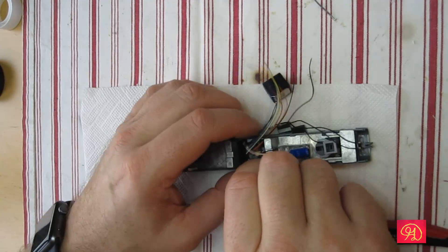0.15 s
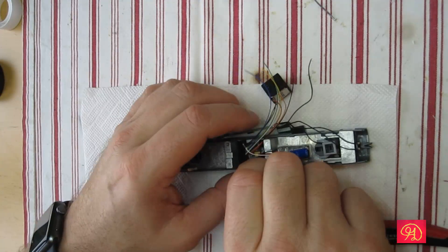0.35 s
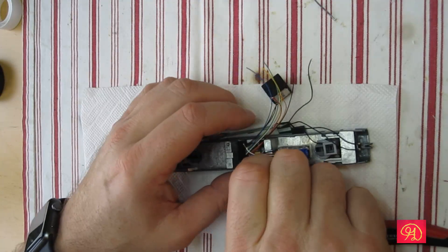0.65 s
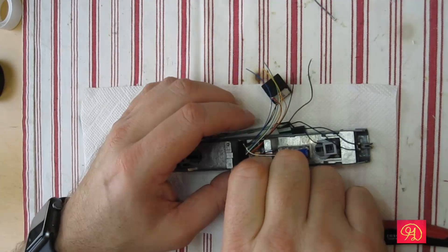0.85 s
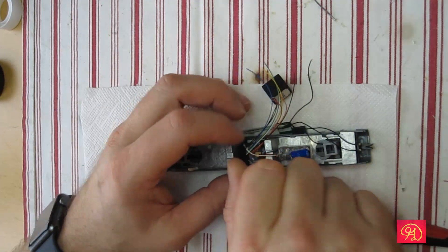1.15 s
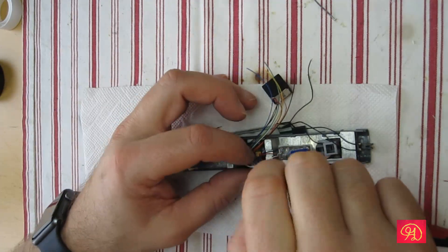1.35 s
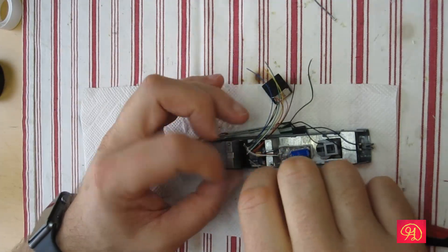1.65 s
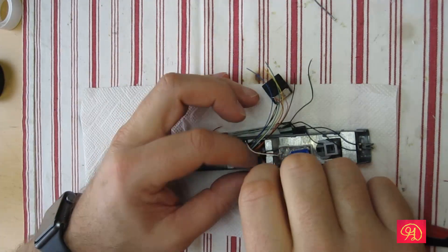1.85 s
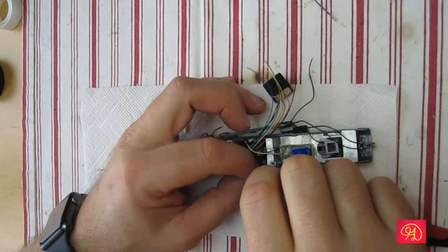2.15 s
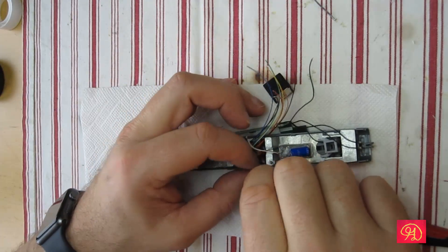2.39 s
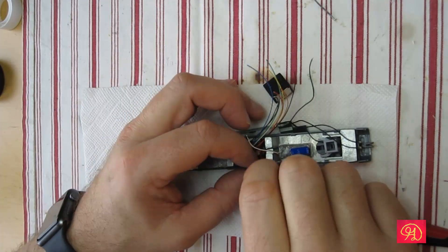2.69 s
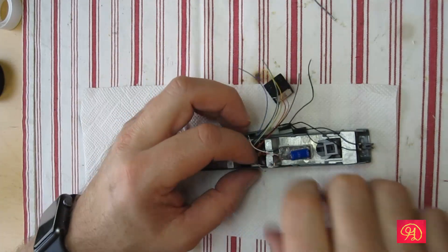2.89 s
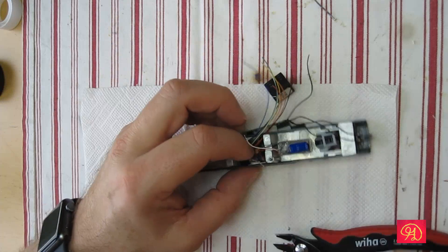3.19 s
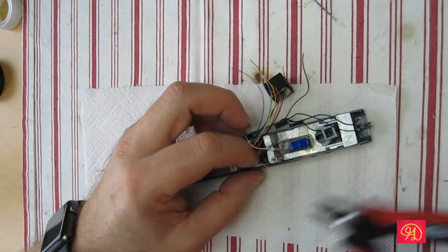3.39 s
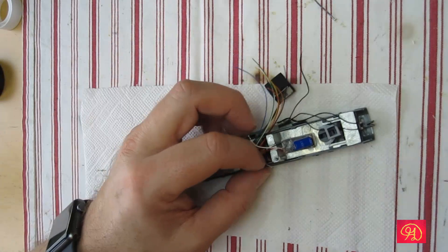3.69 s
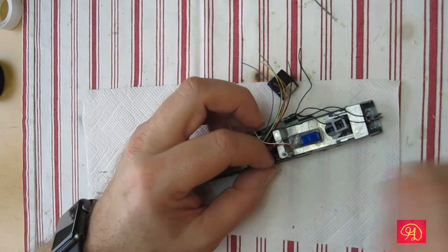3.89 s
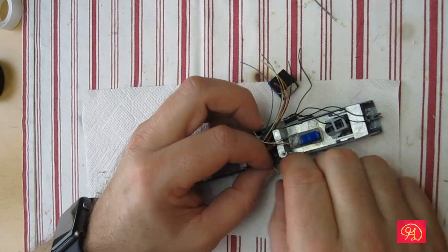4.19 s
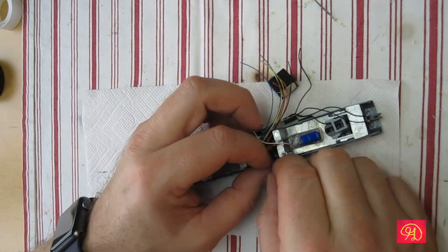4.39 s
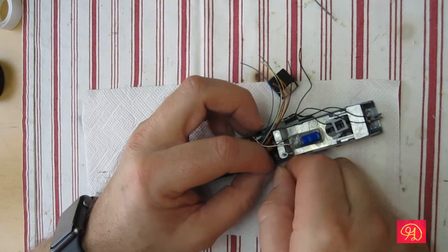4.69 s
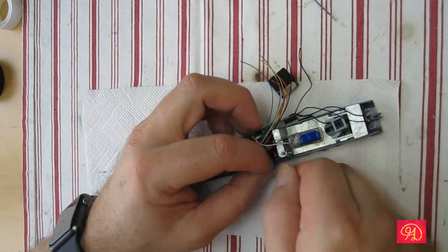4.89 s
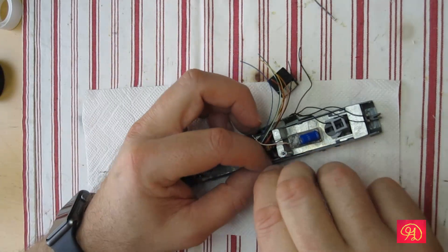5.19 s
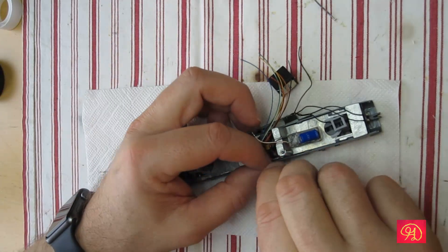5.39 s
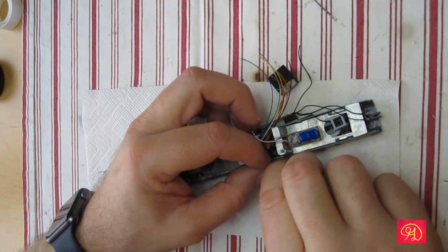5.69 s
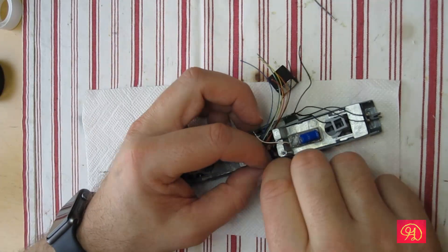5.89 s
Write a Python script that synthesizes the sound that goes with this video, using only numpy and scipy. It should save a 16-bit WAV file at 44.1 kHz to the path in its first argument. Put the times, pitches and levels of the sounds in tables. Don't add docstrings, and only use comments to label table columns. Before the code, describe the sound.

Hands work on a small metal assembly, heard by a camera microphone just above the bench. Sharp little clicks and a brief squeaky scrape open it, followed by sparse ticks and dry rubbing. Paper rustles and pops before a hand tool lands with a burst of hard knocks and rattling jaws, by far the loudest event. Thin whine, hiss and a faint once-a-second clock continue throughout.

```python
import sys
import numpy as np
from scipy import signal
from scipy.fft import rfft, irfft, dct
from scipy.io import wavfile
from scipy.ndimage import uniform_filter1d

SR = 44100
rng = np.random.default_rng(int(sys.argv[2]) if len(sys.argv) > 2 else 0)


def inscribe(sig):
    pcm = np.round(np.clip(np.atleast_2d(sig).T, -1, 1) * 32767)
    wavfile.write(sys.argv[1], SR, pcm.astype(np.int16))


def rack_gain(trim_db):
    fader = np.asarray(trim_db, float)
    return 10 ** (fader / 20)


N = 266805

# [f/Hz, bandwidth/Hz, level/dB]
BOARD_MODES = [(232, 52, -6.5), (292, 38, -8), (404, 140, -1), (537, 170, 1.5), (680, 40, -1.5),
               (870, 120, 3), (970, 300, 5), (1120, 87, 1.5), (1400, 120, 6), (1640, 110, -2.5),
               (1845, 57, -4), (2100, 120, 1), (2500, 69, -10), (2850, 130, -11), (2800, 63, -29),
               (3880, 87, -11.5), (4750, 190, -11.5)]


def add(track, s, sound):
    i = int(s * SR)
    track[i:i + len(sound)] += sound[:N - i]


def unit(x):
    return x / np.sqrt(np.mean(x ** 2))


def band(x, hz, width):
    return signal.lfilter(*signal.iirpeak(hz, hz / width, SR), x)


def lowpass(x, hz):
    return signal.lfilter(*signal.butter(2, hz, fs=SR), x)


def ring(hz, gain, t60):
    t = np.arange(SR // 4)[:, None] / SR
    return np.sum(gain * np.sin(2 * np.pi * hz * t) * 1000 ** (-t / t60), axis=1)


def crack(t60, low_hz, high_hz):
    t = np.arange(SR // 4) / SR
    burst = rng.standard_normal(SR // 4) * 1000 ** (-t / t60) / 2
    return signal.sosfilt(signal.butter(2, [low_hz, high_hz], "band", fs=SR, output="sos"), burst)


def walk(rate):
    k = int(SR / rate)
    return unit(uniform_filter1d(uniform_filter1d(rng.standard_normal(N), k), k))


def grains(count, scatter_db):
    size = rack_gain(scatter_db * rng.exponential(size=count // 40 + 1))
    return unit(rng.standard_normal(count) * np.repeat(size, 40)[:count])


def hiss():
    # [f/Hz, level/dB]
    envelope = [(12, -52), (20, -5.5), (127, -4.5), (163, -6), (187, -2), (319, -5.5), (398, -6), (471, -7),
                (557, -4.5), (1570, -9.5), (1960, -8), (2190, -5), (3070, -13), (9650, -20), (16000, -30.5)]
    hz, db = np.transpose(envelope)
    f = np.maximum(np.fft.rfftfreq(N, 1 / SR), 1)
    shape = rack_gain(np.interp(np.log(f), np.log(hz), db))
    noise = irfft(rfft(rng.standard_normal(N)) * shape, N)
    return rack_gain(-50 + .5 * walk(38)) * unit(noise)


def rumble():
    low = lowpass(rng.standard_normal(N), 160)
    return rack_gain(-65 + 5.5 * walk(8.4)) * unit(low)


def whine():
    whine_hz = [2180.8, 2467.9]
    whine_db = [-54.8, -54.2]
    # [f/Hz, bandwidth/Hz, rms level/dB]
    shell_modes = [(2238, 410, -59), (2500, 560, -59.5), (2305, 370, -67), (405.2, 16, -68),
                   (4630, 280, -67.5), (5660, 330, -69.5), (9600, 720, -72)]
    frame_rate_hz = 29.97
    slip_turns, bend_turns = .47, .04

    t = np.arange(N) / SR
    frame = frame_rate_hz * t % 1
    slip = slip_turns * frame + bend_turns * np.sin(2 * np.pi * frame)
    out = np.zeros(N)
    for hz, db in zip(whine_hz, whine_db):
        out += rack_gain(db) * np.sqrt(2) * np.sin(2 * np.pi * (hz * t - slip))
    for hz, width, db in shell_modes:
        noise = rng.standard_normal(N)
        out += rack_gain(db) * unit(band(band(noise, hz, width), hz, width))
    return out


def clock():
    # [f/Hz, level/dB, t60/s]
    case_modes = [(1172, 9, 0.059), (1224, -2.5, 0.031), (3320, -5, 0.028), (2800, -18, 0.019),
                  (910, -25, .05)]
    beat_peaks = [-44, -41, -49, -46, -46, -40.5]
    first_s, period_s = .372, 1.0

    out = np.zeros(N)
    hz, db, t60 = np.transpose(case_modes)
    t = np.arange(SR // 10) / SR
    for beat, peak_db in enumerate(beat_peaks):
        smear = rng.standard_normal(len(t)) * 1000 ** (-t / 0.5)
        tick = signal.fftconvolve(ring(hz, rack_gain(db), t60), smear)
        add(out, first_s + beat * period_s, rack_gain(peak_db) * tick / np.abs(tick).max())
    return out


def paper():
    # [t/s, peak level/dB]
    crackles = [(.003, -40), (1.1075, -36), (2.997, -32), (3.1115, -33), (3.2125, -31), (3.2315, -23),
                (3.2432, -22.5)]
    out = np.zeros(N)
    for s, peak_db in crackles:
        add(out, s, rack_gain(peak_db) * crack(0.0055, low_hz=2500, high_hz=14000))
    return out


def fingers():
    # [t/s, length/s, level/dB, f/Hz]
    skin = [(0, 0.2, -54, 1770), (.101, 0.067, -55.5, 244), (.091, 0.17, -52, 5200),
            (.81, 0.041, -52.5, 6000), (1.075, .087, -57, 6000), (2.824, 0.076, -51, 3000),
            (2.876, 0.29, -53.5, 5500), (2.965, 0.062, -49, 4300), (3.19, 0.15, -48, 4020),
            (3.215, 0.033, -48, 890), (4.599, 0.15, -57.5, 6700)]
    # [t/s, length/s, level/dB, f/Hz]
    wire = [(0, 0.079, -51.5, 3840), (.36, 0.13, -51, 2800), (1.505, 0.11, -50, 6000),
            (1.822, 0.056, -57, 6000), (2.073, 0.081, -48, 5030), (2.221, 0.08, -50.5, 2500),
            (2.347, 0.1, -51, 2500), (2.397, 0.11, -52, 4530), (3.36, .063, -47.5, 3000),
            (5.375, .12, -56, 3000), (5.72, 0.04, -50, 2800)]
    # [t/s, length/s, level/dB, f/Hz]
    squeak = [(0.0026, 0.073, -41.5, 2510)]

    out = np.zeros(N)
    for strokes, share in (skin, 1.2), (wire, .55), (squeak, 0.014):
        for s, length, db, hz in strokes:
            rub = grains(SR // 4, scatter_db=2.)[:int(length * SR)]
            swell = np.sin(np.pi * np.linspace(.05, 1, len(rub)) ** 0.58)
            scuff = band(band(rub, hz, share * hz), hz, share * hz)
            add(out, s, rack_gain(db) * swell * unit(scuff))
    return out


def parts():
    # [t/s, peak level/dB, f/Hz, crack re ring/dB]
    ticks = [(0.1334, -21.5, 2800, -7), (0.166, -26, 2890, -10), (0.9329, -41.5, 2600, 11.5),
             (1.07, -36.5, 4300, 8.5), (1.0963, -42, 2680, 7), (1.1153, -32, 4500, -2.5),
             (1.827, -34.5, 6960, -0.5), (1.8444, -42, 4160, -12), (2.4078, -27.5, 4500, -3),
             (2.4159, -36, 4580, 4), (2.8105, -27, 7100, 0), (2.8139, -22, 2660, -1),
             (2.8618, -33, 2600, -14), (2.992, -30.5, 3600, -5), (3.22, -35.5, 3500, 6.5),
             (4.1088, -42.5, 4700, 9.5), (5.66, -35, 2920, -14), (5.7348, -32.5, 2630, -18)]
    touch_s = .0012
    t60_s, damping = 0.026, 0.27

    out = np.zeros(N)
    onset = np.minimum(np.arange(SR // 4) / SR / touch_s, 1)
    for s, peak_db, hz, crack_db in ticks:
        detune, uneven = rng.standard_normal((2, 3))
        mode_hz = hz * (1 + 0.023 * detune * np.arange(3))
        cluster = ring(mode_hz, rack_gain(-6.0 + uneven), t60_s * (3000 / hz) ** damping)
        contact = rack_gain(crack_db + 6.5) * crack(0.017, low_hz=1210, high_hz=9700)
        add(out, s, rack_gain(peak_db) * onset * (cluster / np.abs(cluster).max() + contact))
    return out


def tool_jaws():
    # [t/s, peak level/dB]
    snaps = [(3.682, -23.5), (3.685, -35), (3.719, -22.5), (3.7712, -34), (3.7775, -39), (3.8054, -20.5),
             (3.7643, -28), (3.8397, -39), (3.827, -28), (3.842, -35), (3.849, -26), (3.875, -28)]
    out = np.zeros(N)
    for s, peak_db in snaps:
        add(out, s, rack_gain(peak_db) * crack(0.015, low_hz=4500, high_hz=12600))
    return out


def tool_chatter():
    # [t/s, length/s, level/dB]
    spells = [
        (3.674, 0.04, -34),
        (3.74, 0.044, -34),
        (3.827, 0.077, -32.5),
    ]
    attack_s, fall_db_per_s = 0.0032, 297

    t, level = np.arange(N) / SR, np.zeros(N)
    for s, length, level_db in spells:
        rise = np.clip((t - s) / attack_s, 0, 1)
        fall_db = fall_db_per_s * np.maximum(t - s - length, 0)
        level = np.maximum(level, rise * rack_gain(level_db - fall_db))
    rattle = grains(N, scatter_db=2.5)
    body = np.zeros(N)
    for hz, width, db in BOARD_MODES:
        body += rack_gain(db) * band(rattle, hz, 1.7 * width) * np.sqrt(100 / width)
    return level * unit(lowpass(body, 4500))


def tool_bounces():
    # [t/s, peak level/dB, f/Hz of the part that lands]
    knocks = [(3.677, -10.5, 1930), (3.6926, -13, 2540), (3.6958, -7.5, 994), (3.7115, -24, 2100),
              (3.7223, -17, 1020), (3.7408, -10.5, 1040), (3.7453, -13.5, 665), (3.756, -16, 672),
              (3.7644, -7.5, 2100), (3.7733, -20, 700), (3.781, -22, 1330), (3.8059, 0, 2800),
              (3.8128, -15.5, 1400), (3.8215, -12, 1400), (3.8407, -5.5, 2800), (3.85, -10, 1373),
              (3.861, -12, 2650), (3.875, -11.5, 1090), (3.88, -17, 1400), (3.9, -17.5, 1210),
              (3.92, -20, 680)]
    contact_s = .0004
    hardness_db, harder_db = -0.9, 2
    crack_db, crack_rise_db = -17.5, 9.5

    out = np.zeros(N)
    hz, width, db = np.transpose(BOARD_MODES)
    onset = np.minimum(np.arange(SR // 4) / SR / contact_s, 1)
    for s, peak_db, note_hz in knocks:
        detune, uneven = rng.standard_normal((2, len(hz)))
        edge = np.log2(note_hz / 1000)
        tilt_db = (hardness_db + harder_db * edge) * np.log2(hz / 1000)
        drive = rack_gain(db + tilt_db + 2.8 * uneven) * np.sign(detune)
        board = ring(hz * (1 + 0.02 * detune), drive, 1.75 / width)
        note = ring(note_hz, 0.7, 0.032 * (1000 / note_hz) ** 0.53)
        thud = onset * (board + rack_gain(-4.0) * np.abs(board).max() * note)
        contact = rack_gain(crack_db + crack_rise_db * edge) * crack(0.015, low_hz=3000, high_hz=6000)
        add(out, s, rack_gain(peak_db - 1.5) * (thud / np.abs(thud).max() + contact))
    return out


def room(x):
    split_hz, low_t60_s, high_t60_s = 2000, .28, 0.071
    t = np.arange(SR // 2) / SR
    low, high = rng.standard_normal((2, len(t))) * np.minimum(t / 0.0018, 1)
    low = lowpass(low, split_hz) * 1000 ** (-t / low_t60_s)
    high = signal.lfilter(*signal.butter(2, split_hz, "high", fs=SR), high) * 1000 ** (-t / high_t60_s)
    tail = unit(low) + rack_gain(-4) * unit(high)
    return rack_gain(-9) * signal.fftconvolve(x, tail / np.sqrt(len(t)))[:N]


def scene():
    bench = tool_bounces() + tool_jaws() + tool_chatter() + parts() + fingers() + paper()
    mic_low_cut = signal.butter(3, 175, "high", fs=SR, output="sos")
    bench = signal.sosfilt(mic_low_cut, bench + room(bench))
    add(bench, 3.68, rack_gain(-43) * ring(75, 1, t60=0.16))
    return (bench + clock() + whine() + hiss() + rumble())[None]


def thin_out(x):
    # [centre t/s, length/frames, top f/Hz]
    moments = [(.185, 1, 12000), (.428, 2, 6500), (1.32, 1, 10500), (1.555, 1, 12000), (2.855, 1, 8500),
               (3.018, 1, 9500), (3.274, 1, 7000), (3.946, 1, 6000), (4.258, 2, 10000), (4.688, 1, 11000),
               (5.965, 1, 11000)]
    frame_s, fade_s = 1024 / SR, .009
    lost = np.zeros(N)
    for s, frames, top_hz in moments:
        length = frames * frame_s + fade_s
        bar_db = 1.5 + 2 * (frames - 1)
        count = int(length * SR)
        i = int(s * SR) - count // 2
        window = np.sqrt(signal.windows.tukey(count, min(.036 / length, 1)))
        lines = dct(x[i:i + count] * window, norm="ortho")
        hz = np.arange(count) * SR / (2 * count)
        local = np.sqrt(uniform_filter1d(lines ** 2, size=80))
        weak = np.abs(lines) < local * rack_gain(bar_db + 2 * np.log2(hz / 3000 + 1e-3))
        lost[i:i + count] += dct(lines * (weak | (hz > top_hz)), type=3, norm="ortho") * window
    return x - lost


def roll_off(x):
    return signal.sosfilt(signal.butter(12, 16120, fs=SR, output="sos"), x)


def record(dry):
    ceiling = .9
    x = thin_out(ceiling * np.tanh(dry[0] / ceiling))
    top_cut = signal.ellip(10, .2, 90, 15700, fs=SR, output="sos")
    x = signal.sosfilt(top_cut, x)
    return roll_off(x[None])


dry = scene()
out = record(dry)
inscribe(out)
```